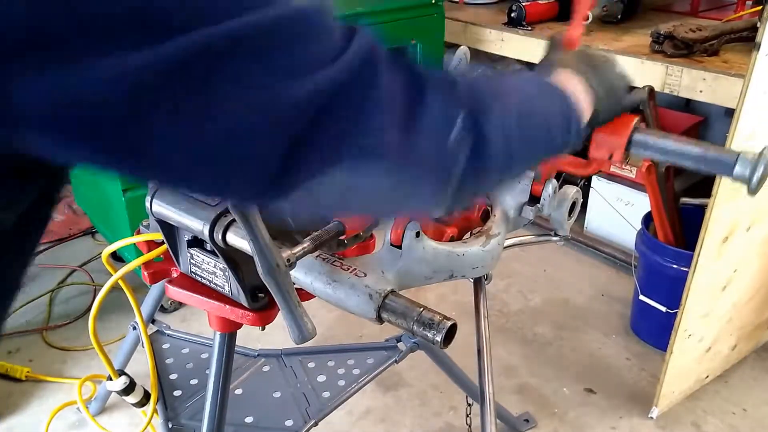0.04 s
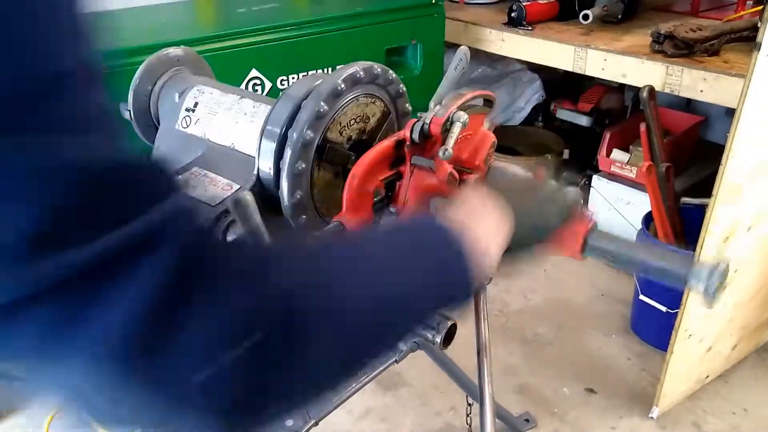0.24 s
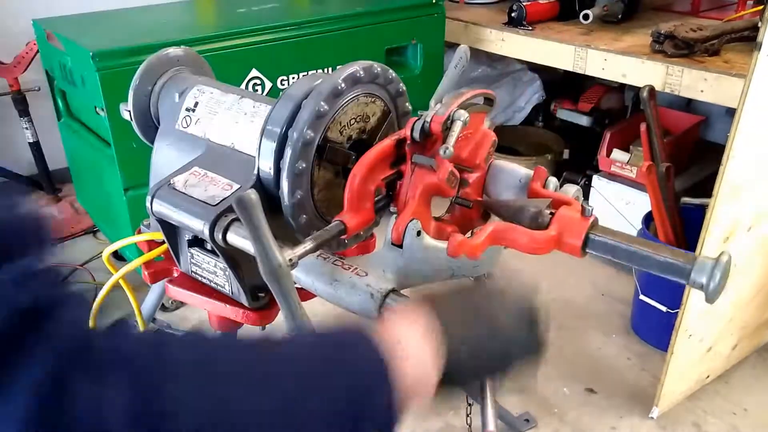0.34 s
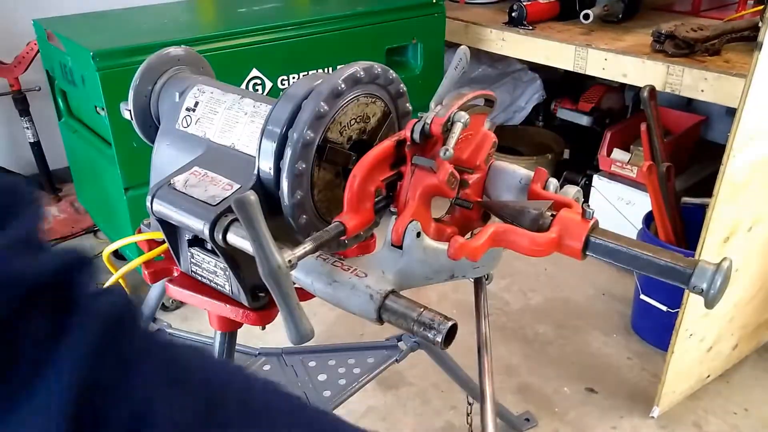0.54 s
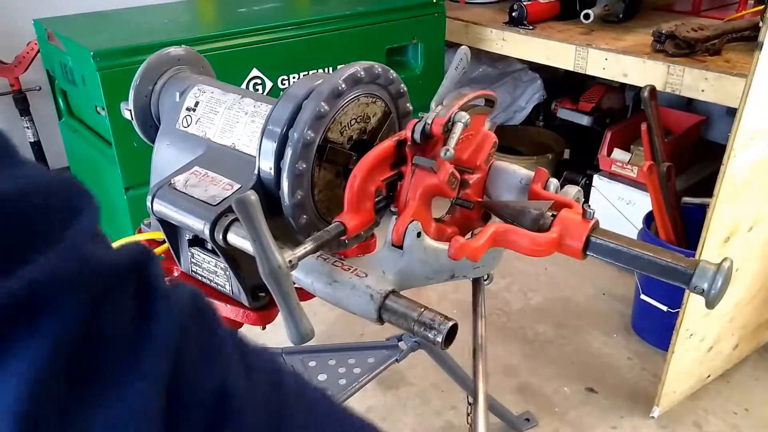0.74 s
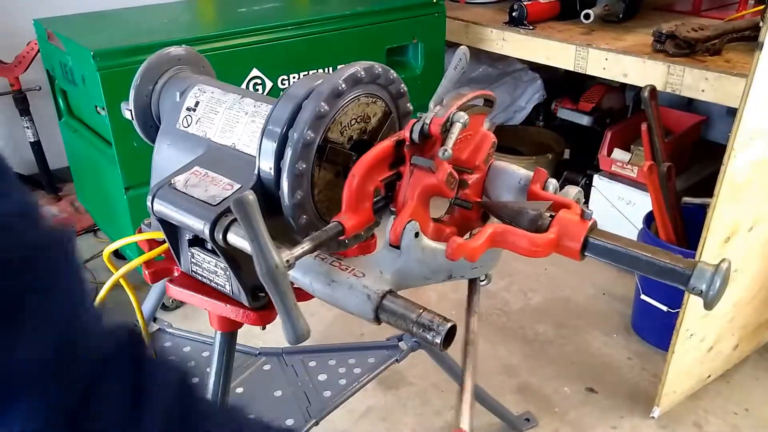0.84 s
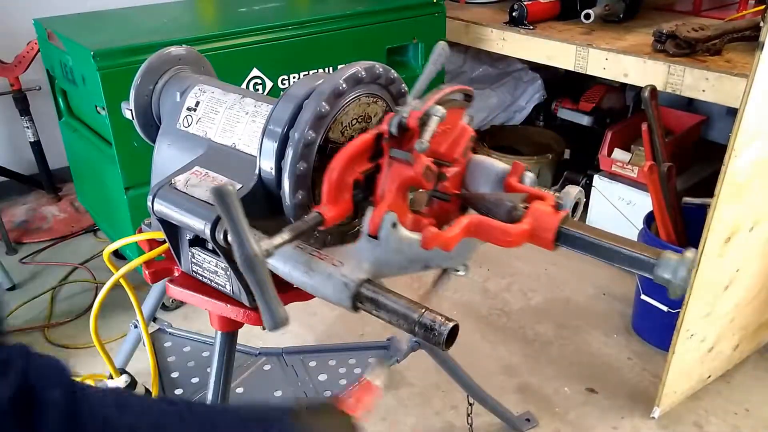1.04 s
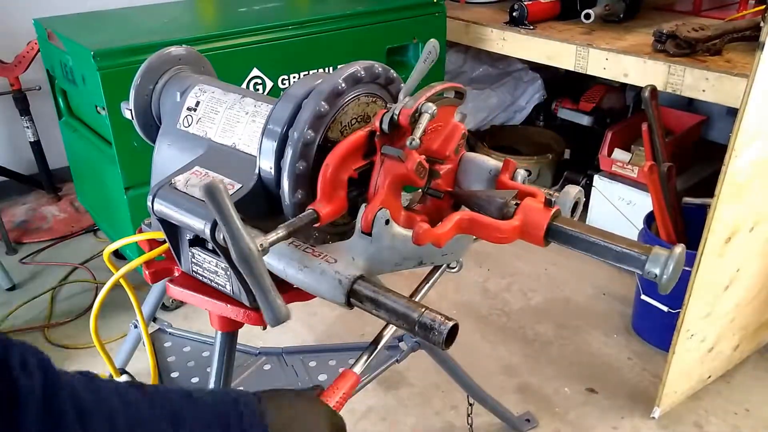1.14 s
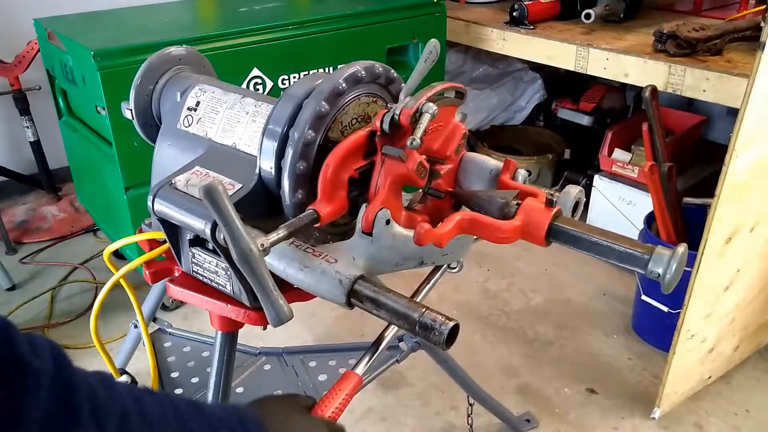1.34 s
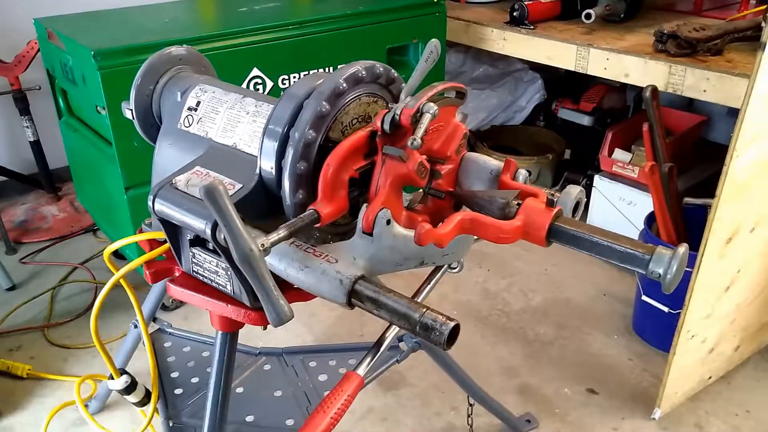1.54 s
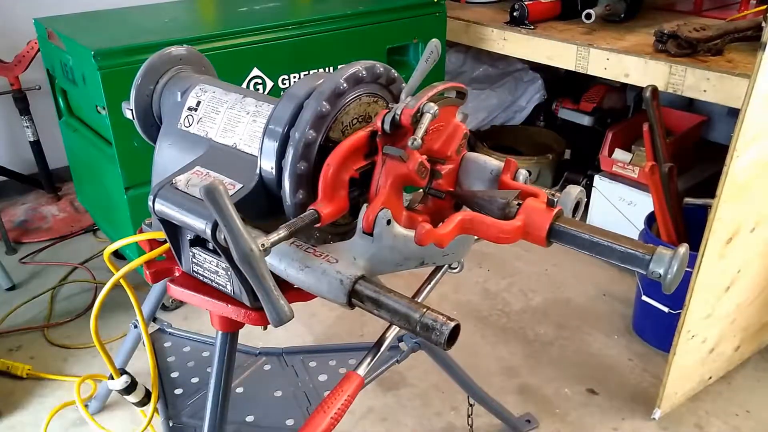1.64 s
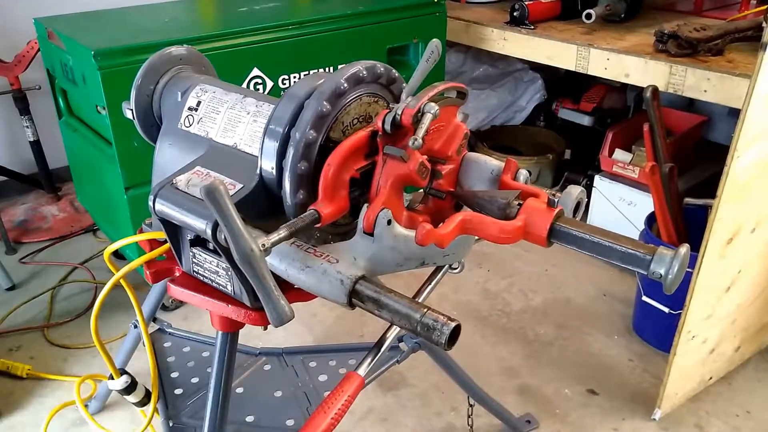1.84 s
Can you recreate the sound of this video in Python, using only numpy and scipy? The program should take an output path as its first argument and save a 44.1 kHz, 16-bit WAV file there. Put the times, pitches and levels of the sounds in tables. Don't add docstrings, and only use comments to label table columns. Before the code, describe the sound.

Close in stereo, a pipe threading machine's arm drops with a loud metallic clatter and short ring, followed by a soft lever tap and a sharper double clack, over low blower drone and faint hiss.

```python
import sys
import numpy as np
from scipy import signal
from scipy.fft import rfft, irfft, next_fast_len
from scipy.io import wavfile
from scipy.ndimage import uniform_filter1d

SR = 44100
rng = np.random.default_rng(int(sys.argv[2]) if len(sys.argv) > 2 else 0)


def unload_audio(sound):
    columns = np.transpose(np.atleast_2d(sound))
    steps = np.round(np.clip(columns, -1, 1) * 32767)
    wavfile.write(sys.argv[1], SR, steps.astype(np.int16))


def voltage_ratio(decibels):
    exponent = np.asarray(decibels, float) / 20
    return 10 ** exponent


N = 83790

# (time [s], level [dB])
BLOWER_EFFORT = [
    (0, -46.5),
    (.24, -43),
    (.32, -52),
    (.6, -52.5),
    (.8, -51),
    (1.1, -46.5),
    (1.3, -46),
    (1.5, -43),
    (1.9, -38.5),
]
# (frequency [Hz], level [dB])
BLOWER_COLOUR = [(30, -19), (100, -23.5), (210, -1), (500, -3.5), (1100, -4.5), (2000, -13.5), (4000, -25),
                 (5000, -44.5)]
# (frequency [Hz], width [Hz], level [dB])
DUCT_TONES = [(77.1, 6.35, -23.5), (121.2, 15, -16.5), (195.3, 15.7, -12.5), (402.8, 22, -7),
              (658, 11, -13), (1118, 27, -13.5), (1674, 37, -17)]
# (frequency [Hz], level [dB])
AIR_COLOUR = [(100, -57.5), (1000, -2), (2500, 7.5), (4000, -7), (4800, -13.5), (7000, -18), (12000, -21),
              (15500, -56.5)]
AIR_DB = -55.5

# (frequency [Hz], t60 [s])
ROOM_T60 = [(200, 0.59), (600, 0.47), (1500, 0.37), (3500, 0.41), (7000, 0.37), (14000, .26)]
ROOM_ONSET_S = 0.0037
STEEL_ROOM_DB, TICK_ROOM_DB = -4, -5

# (time [s], half length [s], level [dB])
SLEEVE_SWISHES = [
    (0.218, 0.03, -68),
    (1.377, .04, -68),
    (1.471, 0.061, -61.5),
    (1.843, 0.018, -67.5),
]
# (frequency [Hz], level [dB])
CLOTH_COLOUR = [(1000, -18.5), (5000, -0.5), (8000, 2.5), (14000, -2.5)]

# (time [s], level [dB], frequency [Hz], t60 [s])
TICKS = [(.234, -8.5, 3140, 0.013), (.2385, -11, 8360, 0.012), (.2444, -6, 7700, 0.02),
         (.247, -2.5, 2150, 0.02), (.2498, -9.5, 3624, 0.025), (.2495, -8.5, 10100, 0.017),
         (.2545, 2, 3250, 0.015), (.252, 1.5, 3600, .015), (.2632, 0, 2350, 0.0077),
         (.277, -2.5, 960, 0.018), (.375, -41, 8400, 0.029), (.5307, -69, 5200, 0.037),
         (.7772, -35.5, 3050, 0.045), (.784, -30.5, 1720, 0.02), (.784, -49, 7700, 0.028),
         (.8052, -44.5, 9000, 0.018), (.7905, -29, 660, 0.022), (.8065, -27, 690, 0.014),
         (1.0785, -23, 8000, 0.024), (1.0805, -15, 3900, 0.024), (1.078, -18, 2790, 0.033),
         (1.101, -22, 3500, 0.013), (1.114, -18, 5000, 0.02), (1.123, -25, 2900, 0.023),
         (1.1434, -16.5, 3100, 0.013), (1.143, -27, 11160, 0.0074), (1.143, -23, 7100, 0.0099),
         (1.143, -24, 4400, 0.009), (1.143, -23.5, 5800, 0.012), (1.143, -24, 8800, 0.0091),
         (1.143, -35, 12600, 0.0071), (1.143, -35, 14300, .008), (.784, -54, 10700, 0.013),
         (.24, -41, 60, 0.054), (.247, -20, 18000, .012)]
# (start time [s], level [dB], t60 [s])
CHATTER = [
    (0.249, -11.5, 0.55),
    (0.784, -33, 0.5),
    (1.084, -27, 0.5),
]
CHATTER_PER_S, CHATTER_SPREAD_DB = 260, 5.0
TICK_SPREAD = 0.08

# (time [s], strength [dB], contact time [ms])
LEVER_HITS = [(.7775, -40, 0.081), (.784, -39, 0.05), (.791, -38.5, 0.22), (.8055, -50.5, .03),
              (1.0765, -32, 0.0528), (1.079, -15, 0.037), (1.086, -20, 0.3), (1.101, -22.5, 0.037),
              (1.116, -27, 0.13), (1.1428, -26, 0.027), (1.168, -48, 0.45), (1.207, -34, 0.62)]
ARM_HITS = [(.2035, -41, 0.69), (.2335, -21, 0.1), (.2385, -16, 0.074), (.2446, -7.5, 0.03),
            (.2478, -2, 0.12), (.2528, -5, 0.05), (.2568, -7.5, 0.22), (.2632, -21, 0.065),
            (.2695, -22.5, 0.27), (.277, -47.5, 0.19), (.375, -19, 0.11), (.5307, -35.5, 0.12),
            (.609, -41.5, 0.11), (.6794, -47, 0.11)]
# (frequency [Hz], level [dB], t60 [s])
LEVER_MODES = [(358.6, -3.5, 0.13), (593, -1, .13), (625, 6.5, 0.038), (727, -1, .08), (935, 1, .09),
               (972, -5, .1), (1114, -8, 0.16), (1226, -14, 0.15), (1400, -9, 0.037), (2017, 4, 0.045),
               (2440, -8, .12), (3050, -2, 0.092), (3730, -5, 0.087), (4400, -4, 0.058)]
ARM_MODES = [(305, -3, .07), (596, 3, .2), (632, 4.5, 0.064), (801, -2, 0.093), (940, 7, .11),
             (1082, 1.5, 0.11), (1210, -3, 0.24), (1400, -2, 0.085), (1594, 11, .07), (1687, 3, .1),
             (1934, 5, 0.066), (2163, 2, .25), (3232, 10, 0.1), (3480, 9.5, 0.062)]
# (frequency [Hz], level [dB])
LEVER_BODY = [(150, -5), (450, -2.5), (750, -1), (1500, -9.5), (3300, -6), (4500, -8), (6500, -22.5),
              (15000, -25.5)]
ARM_BODY = [(150, -8), (450, -1), (750, -3), (1500, 1.5), (3300, 1), (5300, -5.5), (11000, -9.5),
            (15000, -12.5)]
# (frequency [Hz], t60 [s])
BODY_T60 = [(200, 0.22), (1000, 0.1), (4000, 0.093), (14000, 0.056)]
LEVER_CLEAR_DB, LEVER_DB = -3.5, 22
ARM_CLEAR_DB, ARM_DB = -9, 19
RISE_S, CLEAR_RISE_S = 0.00025, 0.005
CLOUD_LOW_HZ, CLOUD_LEAK_DB = 510, -10.5
STEEL_LOW_HZ = 171

# (frequency [Hz], level [dB])
LEFT_COLOUR = [(60, -2), (200, -5), (700, -1), (1500, -3), (2400, -4), (5000, -2.5), (11000, -4),
               (12500, -2)]
# (frequency [Hz], half width [Hz], level [dB])
NOTCHES = [
    (5020, 110, -4),
    (7350, 120, -4),
    (13150, 180, -8),
]
MIC_LOW_HZ, EDGE_HZ, EDGE_DB = 55, 14950, -48
COMB_HZ, STAIR = 1250, 0.5
LIKE_TOP, LIKE_DIP, LIKE_LOSS_PER_KHZ = 0.99, 0.4, 0.012


def evened(x):
    return x / np.sqrt(np.mean(x ** 2) + 1e-20)


def energy_one(x):
    return x / np.linalg.norm(x, axis=-1, keepdims=True)


def read(points, hz):
    f, value = np.transpose(points)
    return np.interp(np.log(hz + 1), np.log(f + 1), value)


def highpass(x, order, hz):
    return signal.sosfilt(signal.butter(order, hz, "high", fs=SR, output="sos"), x)


def noise(colour, patchy_db, t60=None):
    size = 256 if t60 else 1024
    length = SR if t60 else N
    frames = 4 * length // size + 5
    hz = np.fft.rfftfreq(size, 1 / SR)
    real, imag, patches = rng.standard_normal((3, 2, frames, len(hz))).transpose(0, 1, 3, 2)
    patches = uniform_filter1d(uniform_filter1d(patches, size=9, axis=1), size=11, axis=2)
    field_db = read(colour, hz)[:, None] + patchy_db * evened(patches)
    if t60:
        seconds = np.arange(frames) * size / 4 / SR
        field_db = field_db - 60 * seconds / np.maximum(read(t60, hz), 0.01)[:, None]
    field = (real + 1j * imag) * voltage_ratio(field_db)
    return signal.istft(field, nperseg=size, noverlap=3 * size // 4)[1][:, :N]


def blower():
    t = np.arange(N) / SR
    drone = evened(noise(BLOWER_COLOUR, 1.5))
    white = rng.standard_normal((2, N))
    for hz, width, db in DUCT_TONES:
        turn = np.exp(2j * np.pi * hz * t)
        r = np.exp(-np.pi * width / SR)
        slow = white / turn
        for _ in range(2):
            slow = signal.lfilter([1 - r], [1, -r], slow)
        drone = drone + voltage_ratio(db) * evened((turn * slow).real)
    effort_db = np.interp(t, *np.transpose(BLOWER_EFFORT))
    return voltage_ratio(2.0 + effort_db) * evened(drone)


def air():
    return voltage_ratio(AIR_DB) * evened(noise(AIR_COLOUR, 2.4))


def room(x):
    tail = noise([(100, 0), (1000, 0)], 1.5, ROOM_T60)[:, :SR]
    tail = tail * (1 - np.exp(-(np.arange(SR) / SR / ROOM_ONSET_S) ** 2))
    return signal.fftconvolve(x, energy_one(tail), axes=1)[:, :N]


def sleeve():
    t = np.arange(N) / SR
    strokes = sum(voltage_ratio(db) * np.exp(-((t - s) / half) ** 2) for s, half, db in SLEEVE_SWISHES)
    return strokes * evened(noise(CLOTH_COLOUR, 2.5))


def loose_parts():
    rows = list(TICKS)
    for start, db, t60 in CHATTER:
        gap, size, pitch = rng.random((60, 3)).T
        late = np.cumsum(-np.log(gap)) / CHATTER_PER_S
        level = db - 60 * late / t60 + CHATTER_SPREAD_DB * (size - 0.5)
        rows += zip(start + late, level, 900 * 4.2 ** pitch, 0.017 + 0 * late)
    t = np.arange(4000) / SR
    out = np.zeros((2, N + SR))
    draws = rng.random((len(rows), 2, 2, 3, 1))
    for (s, db, hz, t60), (detune, phase) in zip(rows, draws):
        spread = TICK_SPREAD * np.minimum(0.015 / t60, 1) ** 2
        spread = spread * (np.arange(3)[:, None] - 1 + 0.6 * (detune - 0.5))
        modes = np.sin(2 * np.pi * (hz * (1 + spread) * t + 0.38 * phase))
        ring = modes.mean(1) * voltage_ratio(db - 60 * t / t60)
        at = round(s * SR)
        out[:, at:at + len(t)] += ring * np.minimum(t * hz / 2, 1)
    return out[:, :N]


def steel(hits, modes, body, clear_db, level_db):
    t = np.arange(SR // 2) / SR
    phases = 2 * np.pi * rng.random((len(modes), 2, 1))
    out = np.zeros((2, N + SR))
    for s, db, ms in hits:
        at = round(s * SR)
        push = np.sin(np.pi * np.clip((np.arange(64) + 0.5) / max(ms * SR / 1000, 1), 0, 1))
        cloud = noise(body, 2.2, BODY_T60)[:, :len(t)]
        cloud = voltage_ratio(CLOUD_LEAK_DB) * cloud + highpass(cloud, 4, CLOUD_LOW_HZ)
        clear = 0
        for (hz, level, t60), phase in zip(modes, phases):
            tone = np.sin(2 * np.pi * hz * (t + at / SR) + phase)
            clear = clear + voltage_ratio(level - 60 * t / t60) / np.sqrt(t60) * tone
        clear = voltage_ratio(clear_db) * energy_one(clear) * (1 - np.exp(-t / CLEAR_RISE_S))
        ring = (energy_one(cloud) + clear) * (1 - np.exp(-t / RISE_S))
        out[:, at:at + len(t)] += voltage_ratio(db + level_db) * signal.lfilter(push / push.sum(), 1, ring)
    return out[:, :N]


def lever():
    return steel(LEVER_HITS, LEVER_MODES, LEVER_BODY, LEVER_CLEAR_DB, LEVER_DB)


def arm():
    return steel(ARM_HITS, ARM_MODES, ARM_BODY, ARM_CLEAR_DB, ARM_DB)


def scene():
    metal = highpass(arm() + lever(), 3, STEEL_LOW_HZ)
    loose = loose_parts()
    wet = room(voltage_ratio(STEEL_ROOM_DB) * metal + voltage_ratio(TICK_ROOM_DB) * loose)
    return metal + loose + wet + blower() + air() + sleeve()


def roll_off(x):
    return signal.sosfilt(signal.butter(12, 16440, fs=SR, output="sos"), x)


def record(dry):
    size = next_fast_len(N + 4096)
    hz = np.fft.rfftfreq(size, 1 / SR)
    right, own = rfft(dry, size)
    u = hz / COMB_HZ
    comb = np.where(u < 1, np.sqrt(np.minimum(u, 1)), 0.5 + 0.5 * np.cos(2 * np.pi * u))
    like = (LIKE_DIP + (LIKE_TOP - LIKE_DIP) * comb) * (1 - LIKE_LOSS_PER_KHZ * hz / 1000)
    steps = np.clip(u - 1 - STAIR * np.sin(2 * np.pi * u) / (2 * np.pi), 0, 20)
    steps = steps * np.clip((u - 1.2) / 0.3, 0, 1)
    left = like * right * np.exp(-1j * np.pi * steps) + np.sqrt(1 - like ** 2) * own
    left = left * voltage_ratio(read(LEFT_COLOUR, hz))
    top_edge = voltage_ratio(EDGE_DB * np.clip((hz - EDGE_HZ) / 300, 0, 1))
    low_edge = 1 / np.sqrt(1 + (MIC_LOW_HZ / (hz + 1)) ** 6)
    dips = voltage_ratio(sum(db * np.exp(-((hz - f) / half) ** 2) for f, half, db in NOTCHES))
    mix = irfft(top_edge * low_edge * dips * np.array([left, right]), size)[:, :N]
    mix = np.clip(mix, -0.97, 0.97)
    return roll_off(mix)


dry = scene()
out = record(dry)
unload_audio(out)
```